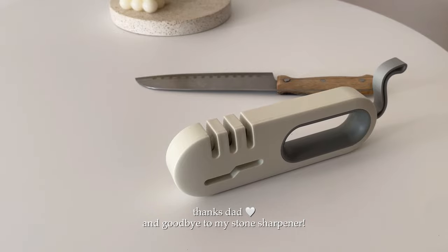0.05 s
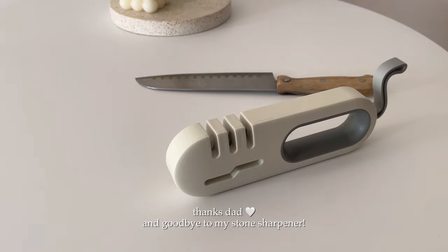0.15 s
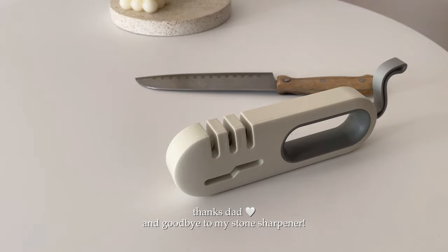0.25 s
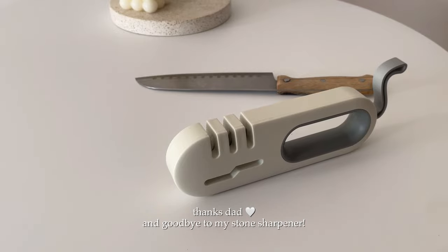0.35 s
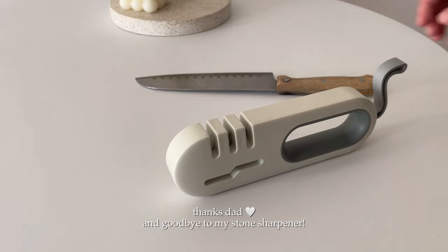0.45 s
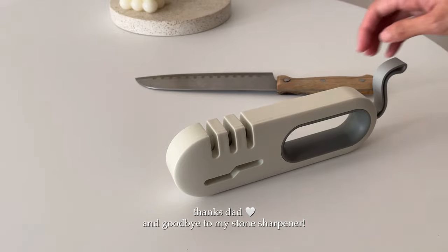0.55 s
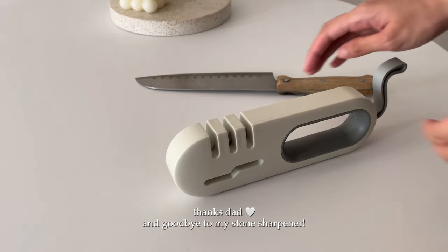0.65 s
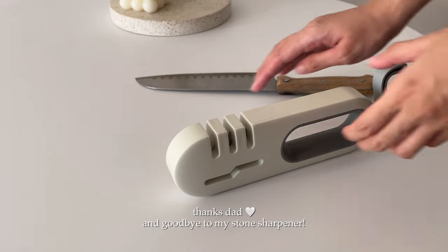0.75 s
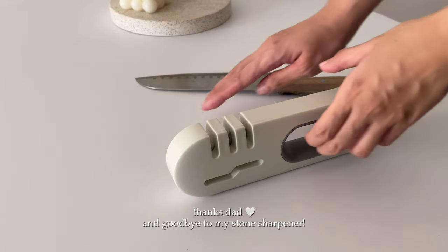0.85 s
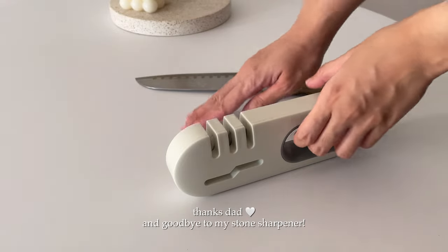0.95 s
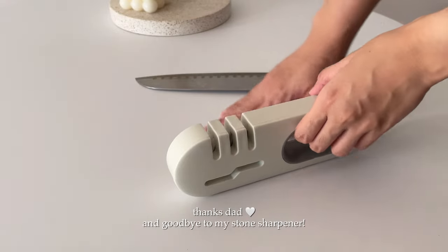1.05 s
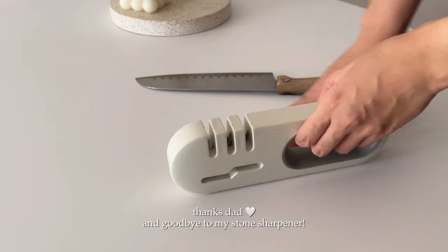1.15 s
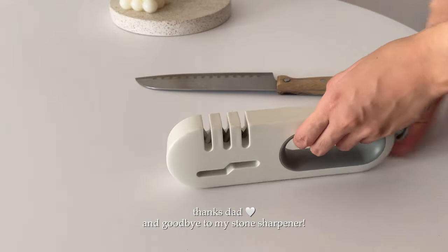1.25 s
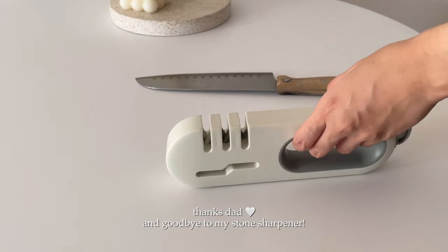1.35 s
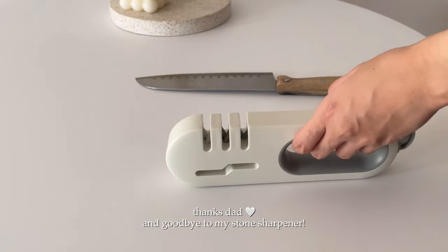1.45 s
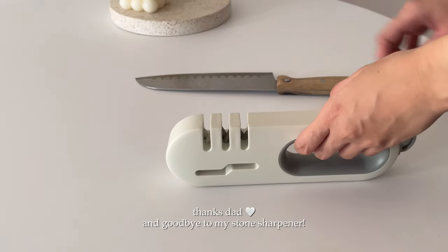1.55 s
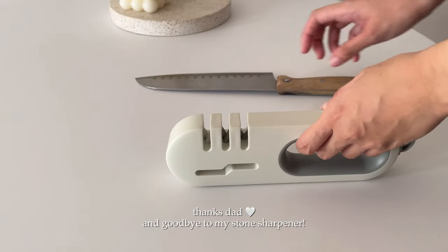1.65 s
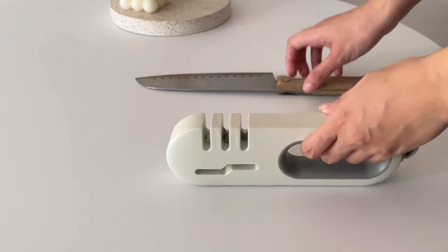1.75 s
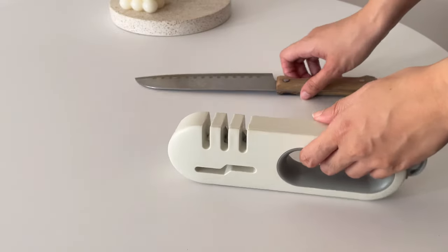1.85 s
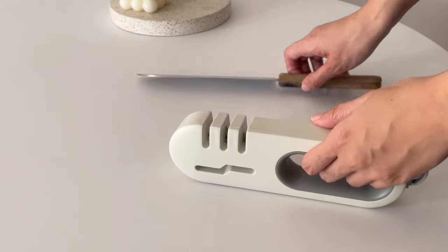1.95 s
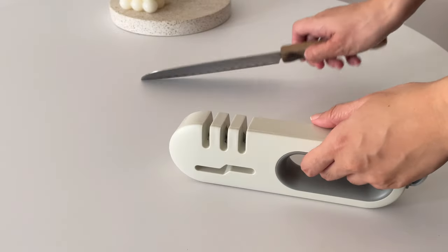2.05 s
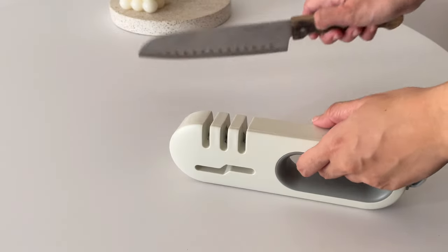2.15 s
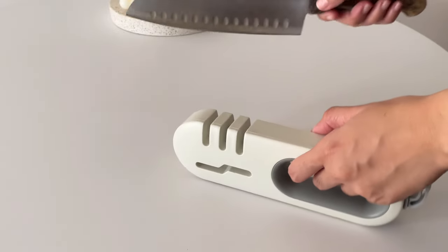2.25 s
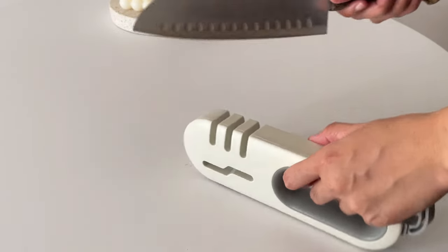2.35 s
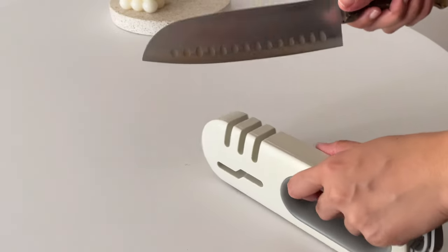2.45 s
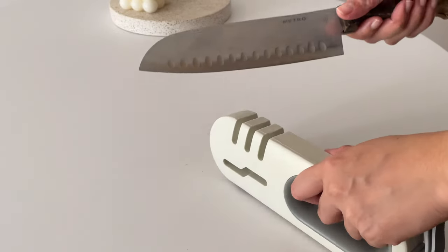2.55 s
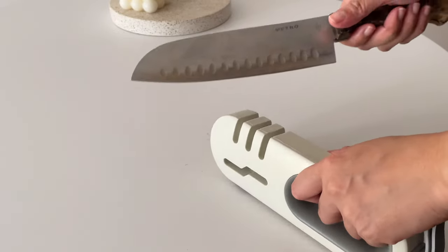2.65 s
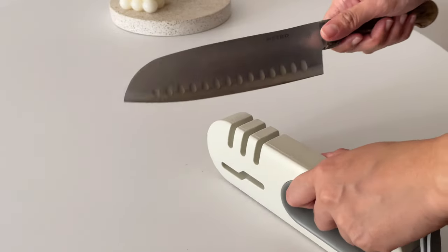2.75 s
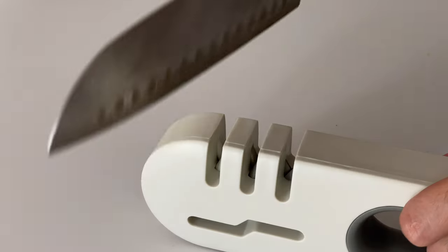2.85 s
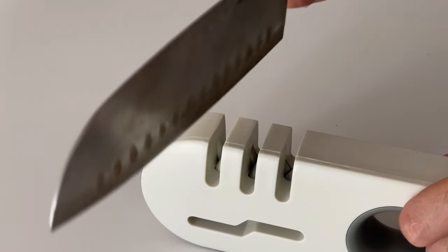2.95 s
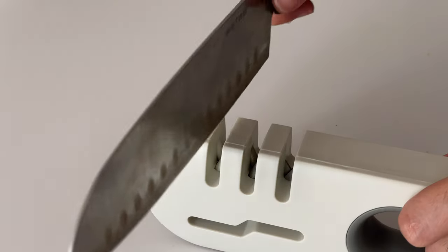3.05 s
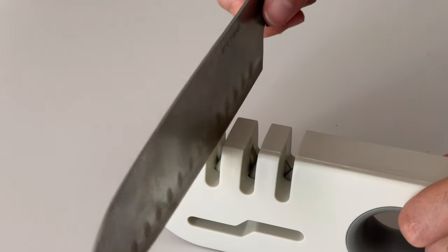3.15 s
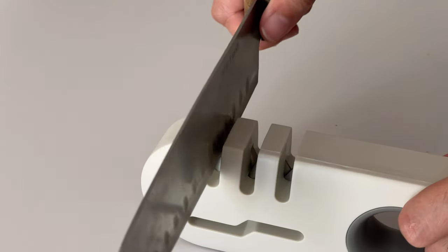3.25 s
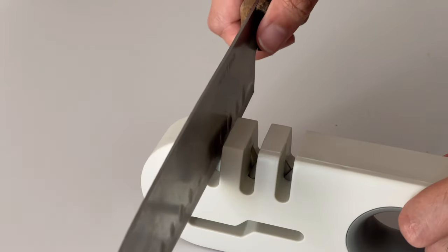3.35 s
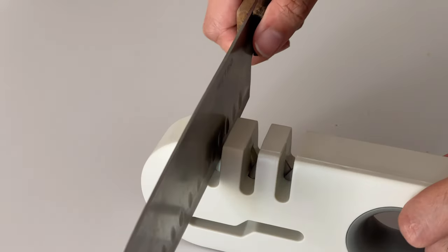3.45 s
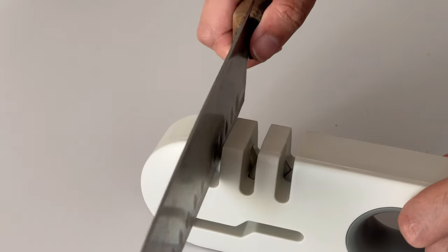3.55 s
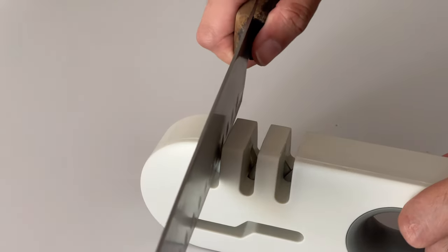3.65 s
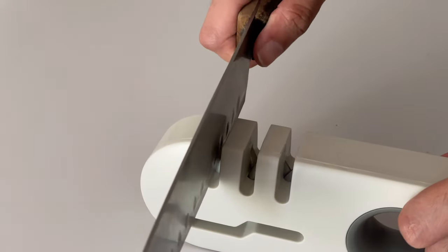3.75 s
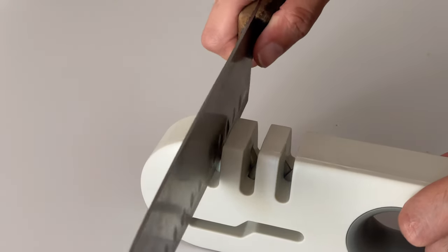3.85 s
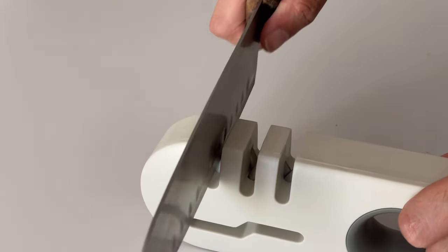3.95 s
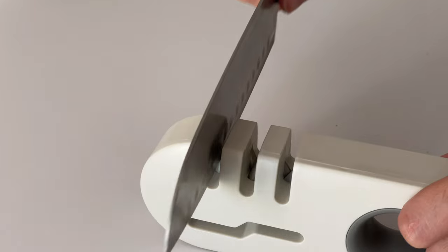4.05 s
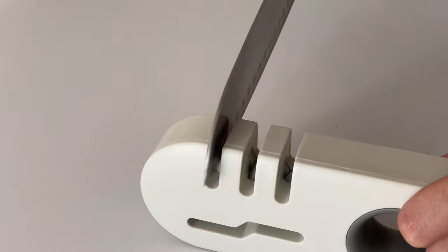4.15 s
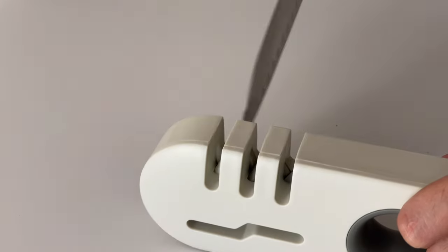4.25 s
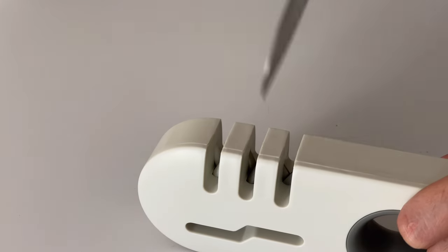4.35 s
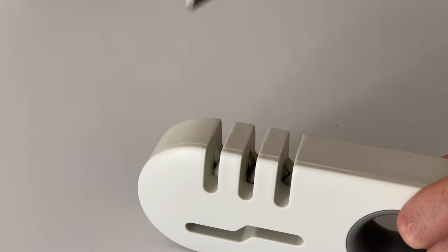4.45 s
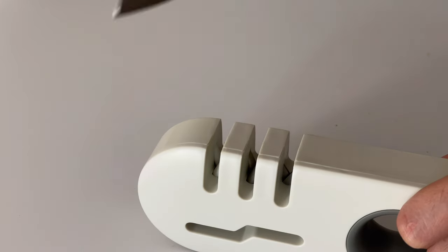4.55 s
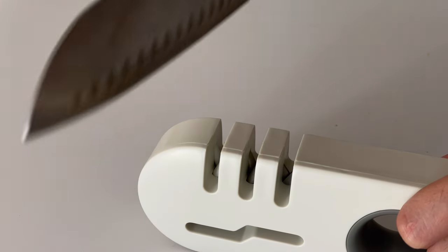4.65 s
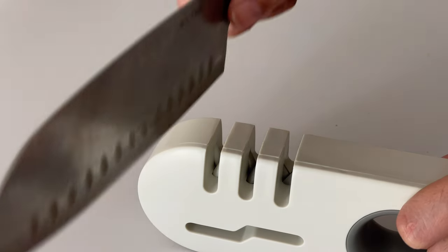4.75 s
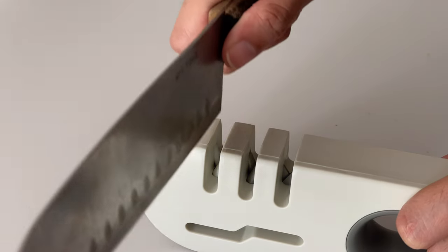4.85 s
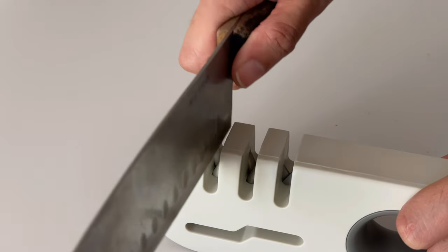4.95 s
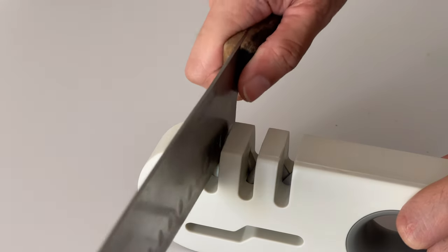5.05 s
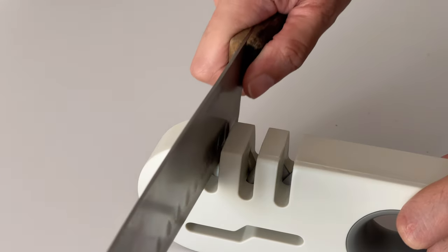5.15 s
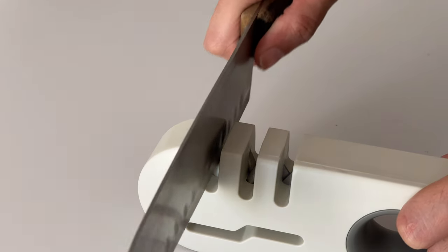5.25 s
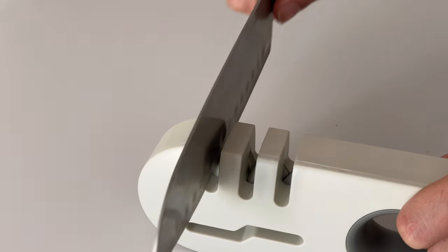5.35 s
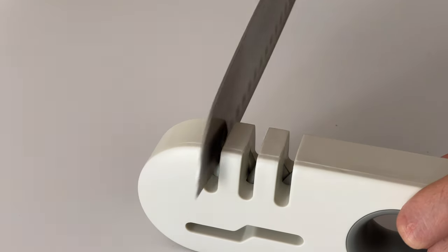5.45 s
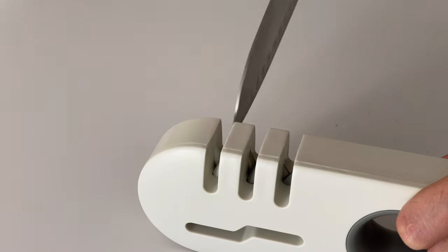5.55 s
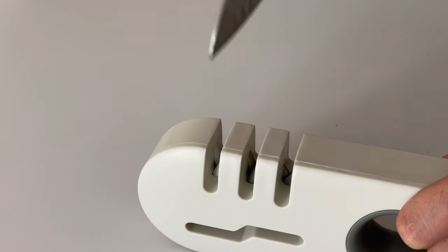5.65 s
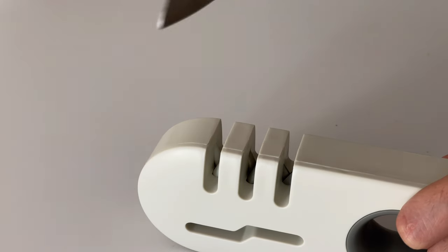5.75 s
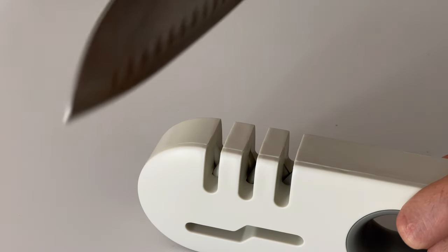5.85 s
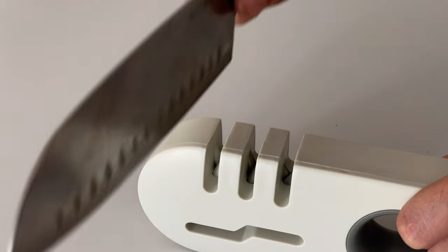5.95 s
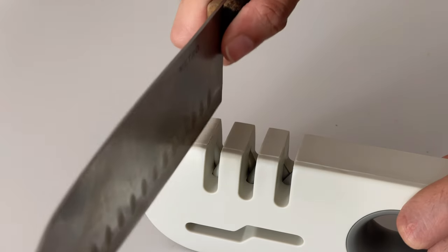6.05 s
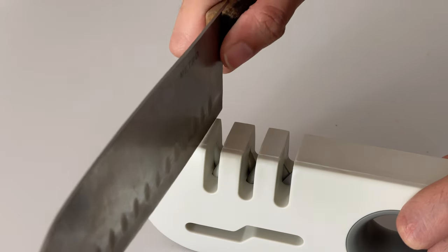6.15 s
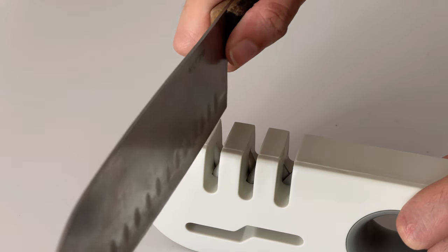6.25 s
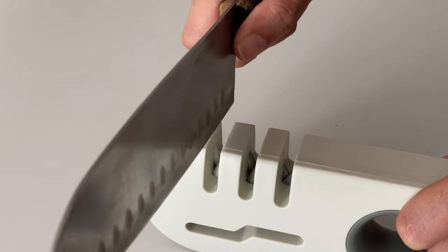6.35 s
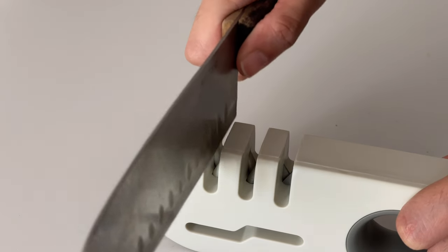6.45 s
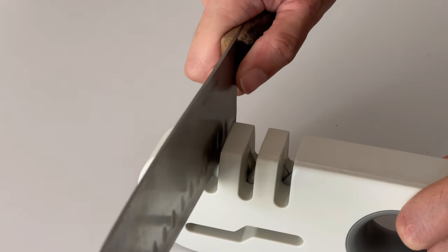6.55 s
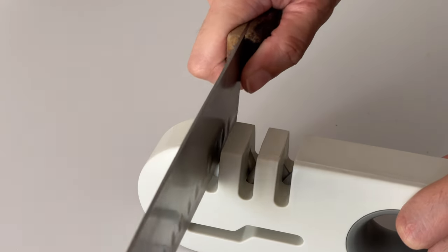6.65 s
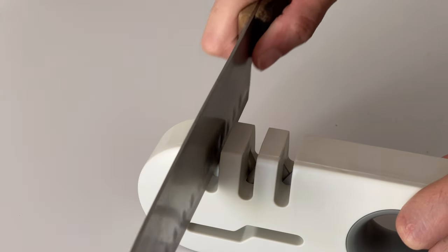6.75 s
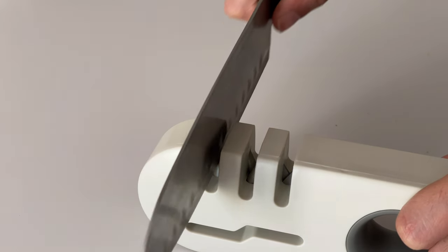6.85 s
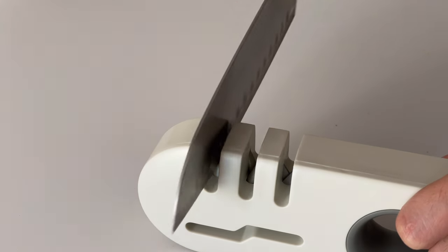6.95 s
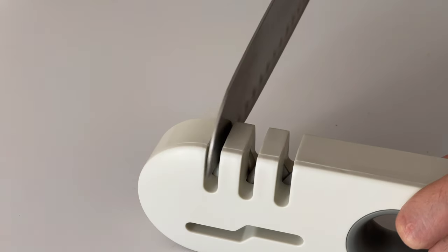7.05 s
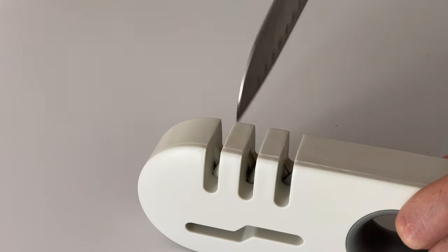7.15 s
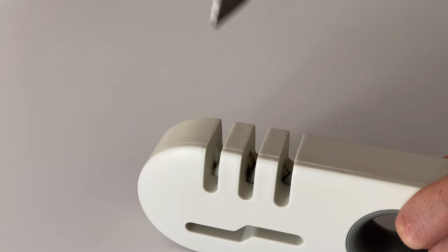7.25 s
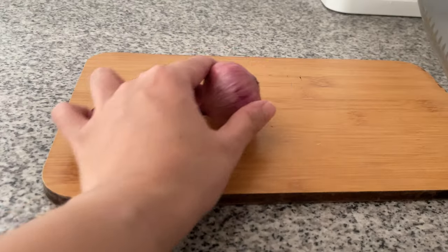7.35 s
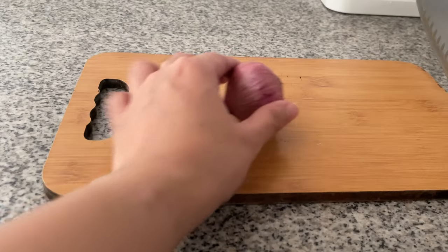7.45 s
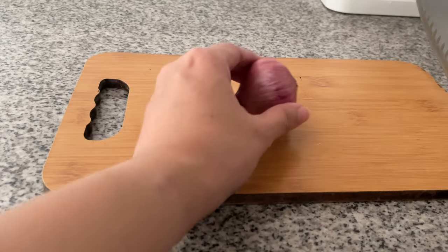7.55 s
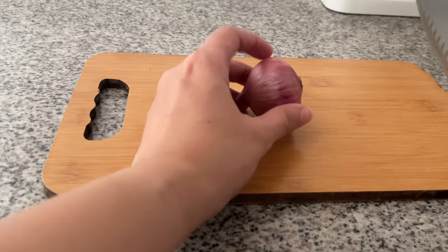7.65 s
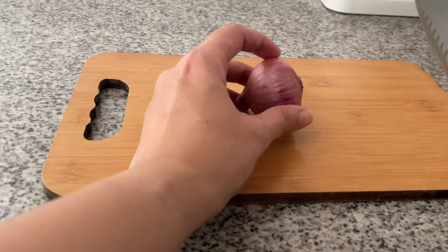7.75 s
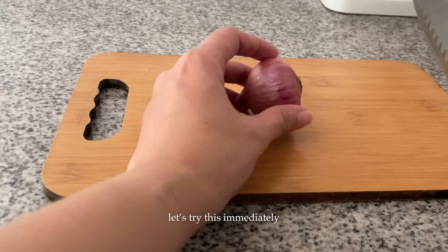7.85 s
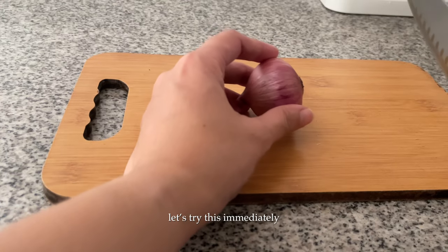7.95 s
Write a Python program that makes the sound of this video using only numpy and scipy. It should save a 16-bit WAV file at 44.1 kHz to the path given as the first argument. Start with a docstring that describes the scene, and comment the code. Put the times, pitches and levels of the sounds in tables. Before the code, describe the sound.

Soft handling and rubbing on a table, then three separate raspy steel-on-abrasive strokes with clinks and hard clicks in a quiet room.

```python
"""Over a small room's hum and air, hands slide a plastic sharpener on a table: friction noise, rubbing feet, bumps.
A knife is picked up, its wooden handle juddering in damped modes; the edge then scuffs and clinks in the slot.
Three pulls follow: abrasive slips excite the steel's resonances and shake the plastic body. Impacts knock
the sharpener on the table, hardest as the tip drops out of the first pull.
The room tone is softest while the blade works. At the end a hand rustles softly."""
import sys
import numpy as np
from scipy import signal
from scipy.fft import rfft, irfft, next_fast_len
from scipy.io import wavfile
from scipy.ndimage import uniform_filter1d, map_coordinates

SR = 44100
rng = np.random.default_rng(int(sys.argv[2]) if len(sys.argv) > 2 else 0)


def put_to_file(sound):
    """Save the sound as 16-bit audio at rate SR, in the file named by the first command-line argument."""
    columns = np.atleast_2d(sound).T  # one column per channel
    safe = np.clip(columns, -1, 1)
    whole_steps = np.round(safe * 32767)
    wavfile.write(sys.argv[1], SR, whole_steps.astype(np.int16))


N = 353108

# Event levels set the balance within a layer; layer gains follow in the functions.
# resonances of the blade in the slot: f/Hz, width/Hz, relative level/dB
BLADE_MODES = [(1515, 76, 1), (1890, 72, -10), (2363, 140, -7), (3056, 64, 0.5), (3995, 200, -1.5),
               (4740, 40, -4), (5063, 150, 2), (5300, 48, -8), (6900, 52, -4), (7540, 41, -16),
               (12000, 110, -8), (12900, 320, -3), (13500, 94, -14), (14400, 290, -11.5)]
# spectrum of the grit on the edge: f/Hz, relative level per Hz/dB
GRIT_SPECTRUM = [(300, -32), (800, -15), (1300, -12.5), (3000, -7), (5200, -6.5), (6500, -8), (8000, -2),
                 (10000, -5.5), (13000, -6), (16000, -14.5)]
# spectrum of the shaken plastic body: f/Hz, relative level per Hz/dB
BODY_SPECTRUM = [(40, -18.5), (130, -14.5), (240, 5), (330, -5.5), (500, -10), (900, -23), (1800, -40.5)]
# spectrum of the rasp as the tip passes: f/Hz, relative level per Hz/dB
TIP_SPECTRUM = [(1200, -22), (2800, -7), (4000, 0), (5400, 1.5), (7000, -4), (9000, -10.5), (16000, -24)]


def grinding(grain_db, judder_db, drift):
    """Friction excitation: grains tear at the edge; tiny slips ring the blade and shake the plastic body."""
    coarse, fine, chatter, rasp = edge_contact()
    roughness_db = grain_db * wobble(1800) + judder_db * wobble(200)
    slips = unit(rng.standard_normal(N) * amp(roughness_db))

    def steel_gain(hz):
        return np.sqrt(resonances(BLADE_MODES, hz) + amp(along(GRIT_SPECTRUM, hz)) ** 2)

    def above(hz, edge_hz):
        return 1 / (1 + (edge_hz / (hz + 1)) ** 12)

    steel = patchy(ringing(slips, steel_gain), depth_db=2.2)
    low = unit(filtered(steel, lambda hz: 1 - above(hz, edge_hz=2740)))
    middle = unit(filtered(steel, lambda hz: above(hz, edge_hz=2640) - above(hz, edge_hz=7050)))
    high = unit(filtered(steel, lambda hz: above(hz, edge_hz=6930)))
    # the middle resonances wander as the clamped point and the pressure change
    shift = np.cumsum(drift * wobble(25))
    middle = map_coordinates(middle, [np.arange(N) + shift], mode="mirror")
    blade = amp(-1.0) * chatter * low + amp(0.2) * coarse * middle + amp(3) * fine * high
    tip = rasp * coloured(slips, TIP_SPECTRUM)
    body = chatter * coloured(slips, BODY_SPECTRUM)
    return blade + tip + body


# pulls of the edge through the slot: start t/s, end t/s, grinding level/dB, time to bite/s,
# tip passes t/s, tip rasp level/dB, blade chatter level/dB
PULLS = [(3.855, 4.231, -46, .06, 4.224, -39.5, -50.5), (5.108, 5.536, -49, 0.031, 5.503, -39, -51),
         (6.624, 7.107, -50, 0.044, 7.099, -46, -51.5)]
# the edge scuffs and catches while it settles: start t/s, end t/s, grinding level/dB, blade chatter level/dB
SCUFFS = [(3.298, 3.352, -63.5, -67.5), (3.397, 3.436, -68, -63), (3.466, 3.553, -73.5, -72.5),
          (3.677, 3.71, -78.5, -74.5), (5.026, 5.071, -57.5, -52), (5.16, 5.175, -53.5, -65.5),
          (6.514, 6.554, -63, -52)]
BITE_DB = 22  # the grinding starts this far below its full level
SPEED_UP_S = 0.088  # time constant with which the hand gathers speed
HISS_DB, HISS_GROWS_DB = -1.5, 26.5  # fine hiss at full speed re grinding, before band gains; growth from rest
CHATTER_GROWS_DB = 16.5  # growth of the blade's chatter from rest
LIFT_S = 0.018  # the edge meets and leaves the abrasive
TIP_S, TIP_HISS_DB, TIP_CHATTER_DB = 0.02, 3, 1  # width of the tip's passing; its lift of hiss and chatter
SCUFF_RISE_S, SCUFF_FALL_S, SCUFF_HISS_DB = 0.013, .04, -11  # hiss re grinding, before band gains


def edge_contact():
    """Speed-dependent friction: gains of grinding, hiss, chatter and rasp as edge bites, hand speeds up, tip passes."""
    coarse, fine, chatter, rasp = np.zeros((4, N))
    for start, end, db, bite_s, tip_s, tip_db, chatter_db in PULLS:
        age = np.maximum(clock() - start, 0)
        touch = swell(start, end, LIFT_S, LIFT_S)
        slowness = np.exp(-age / SPEED_UP_S)
        tip = bell(tip_s, TIP_S)
        coarse += touch * amp(db - BITE_DB * np.exp(-age / bite_s))
        fine += touch * amp(db + HISS_DB - HISS_GROWS_DB * slowness + TIP_HISS_DB * tip)
        chatter += touch * amp(chatter_db - CHATTER_GROWS_DB * slowness + TIP_CHATTER_DB * tip)
        rasp += touch * amp(tip_db) * tip
    for start, end, db, chatter_db in SCUFFS:
        touch = swell(start, end, SCUFF_RISE_S, SCUFF_FALL_S)
        coarse += touch * amp(db)
        fine += touch * amp(db + SCUFF_HISS_DB)
        chatter += touch * amp(chatter_db)
    return coarse, fine, chatter, rasp


def patchy(x, depth_db):
    """Moving excitation point: each band swells and fades on its own as the contact travels along the blade."""
    z = signal.stft(x, nperseg=512)[2]
    field = rng.standard_normal(z.shape)
    field = uniform_filter1d(field, size=4, axis=0)  # smooth over frequency
    field = uniform_filter1d(field, size=12, axis=1)  # smooth over time
    return signal.istft(z * amp(depth_db * unit(field)), nperseg=512)[1][:N]


# the blade clinks against the slot's wall: t/s, blade ring level/dB, bright tick level/dB, thump level/dB
CLINKS = [(3.2866, -49, -46, -73), (3.544, -78, -60.5, -71), (3.8096, -74.5, -66.5, -73.5),
          (4.999, -56, -63, -56.5), (5.021, -45, -48, -61.5), (6.507, -45, -42.5, -46.5)]
# the blade lands in the slot or drops off it and knocks the sharpener on the table:
# t/s, click level/dB, bright tick level/dB, thump level/dB, table boom level/dB
KNOCKS = [(3.8335, -64, -62, -60, -75.5), (4.2304, -17, -37, -25, -37), (5.0691, -37.5, -42.5, -44, -44.5),
          (6.096, -39, -72, -46, -49.5), (6.563, -38.5, -44.5, -48.5, -47),
          (7.1259, -42.5, -46.5, -40.5, -50)]
# dull bumps of things being shifted: t/s, level/dB
BUMPS = [(1.06, -53.5), (1.189, -45), (1.225, -62), (1.371, -49.5), (1.451, -53), (7.41, -69), (7.778, -52)]
# modes of the sharpener's thump on the table: f/Hz, relative level/dB, t60/s
THUMP_MODES = [(227.1, -4, 0.2), (254.6, -0.5, 0.21), (304.7, -14, 0.27), (423, -12, 0.13),
               (624, -21.5, .12), (1140, -19, 0.095)]
# modes of the table top's boom: f/Hz, relative level/dB, t60/s
BOOM_MODES = [(91, -4, 0.2), (122.8, 1.5, 0.16), (159.6, -5, 0.31)]
# spectrum of the click: f/Hz, relative level per Hz/dB
CLICK_SPECTRUM = [(150, -13), (400, 2.5), (600, 6), (800, -1.5), (1150, 3.5), (1550, 1.5), (1900, -10.5),
                  (2500, -2.5), (3500, -13.5), (5000, -23), (7000, -24), (15000, -47.5)]
# spectrum of the bright tick: f/Hz, relative level per Hz/dB
TICK_SPECTRUM = [(1000, -16.5), (3000, -1.5), (5000, -7), (7500, -3.5), (12500, -7), (16000, -15.5)]
# click re ring in a clink; ring re click in a knock; both before layer gains
CLINK_CLICK_DB, KNOCK_RING_DB = -7, -25


def contacts(click_t60, tick_t60, ring_t60):
    """Impact excitation: steel strikes the slot, clicks and rings; sharpener and table answer in damped modes."""
    clicks, ticks, rings, lows = np.zeros((4, N))
    blows = [(s, db + CLINK_CLICK_DB, tick_db, db, thump_db) for s, db, tick_db, thump_db in CLINKS]
    blows += [(s, db, tick_db, db + KNOCK_RING_DB, thump_db) for s, db, tick_db, thump_db, _ in KNOCKS]
    for s, click_db, tick_db, ring_db, thump_db in blows:
        add(clicks, s, amp(click_db) * crack(click_t60, spike_db=8.5))
        add(ticks, s, amp(tick_db) * crack(tick_t60, spike_db=5.0))
        add(rings, s, amp(ring_db) * burst(ring_t60))
        add(lows, s, amp(thump_db + 5) * knock(THUMP_MODES, rise=0.0044))
    for s, *_, boom_db in KNOCKS:
        add(lows, s, amp(boom_db + 5.0) * knock(BOOM_MODES, rise=0.0033))
    for s, db in BUMPS:
        add(lows, s, amp(db + 4.0) * knock(BOOM_MODES, rise=0.0025))
    # a blow rings the low bending modes more than grinding does
    steel = ringing(rings, lambda hz: np.sqrt(resonances(BLADE_MODES, hz) / (1 + (hz / 2600) ** 2)))
    click = amp(-5.5) * coloured(clicks, CLICK_SPECTRUM)
    tick = amp(3.0) * coloured(ticks, TICK_SPECTRUM)
    return click + tick + steel + lows


def crack(t60, spike_db):
    """Two-stage decay: a hard first instant, then a short rattle."""
    return burst(t60) + amp(spike_db) * burst(t60 / 7)


def knock(modes, rise):
    """Modal synthesis: a soft contact pushes damped modes, at new strengths each time."""
    t = np.arange(SR // 2) / SR
    ring = np.zeros(len(t))
    for hz, db, t60 in modes:
        decay_db = db + rng.normal(0, 1) - 60 * t / t60
        ring += amp(decay_db) * np.sin(2 * np.pi * hz * t)
    return ring * (1 - np.exp(-(t / rise) ** 2))


# light taps of fingers and handle: t/s, level/dB
TAPS = [(0.313, -49), (0.335, -47.5), (0.4912, -49.5), (2.7273, -55.5), (2.7518, -50.5), (2.7701, -51),
        (2.8171, -50), (7.3264, -52), (7.915, -59)]
# the wooden handle judders over the table: t/s, width/s, level/dB, lowest resonance f/Hz, upper modes level/dB
JUDDERS = [(1.787, 0.011, -38.5, 316, -7), (1.815, 0.011, -44.5, 312, 3), (1.861, 0.068, -52.5, 226, -8),
           (1.99, 0.055, -49.5, 268, -13.5), (2.065, 0.017, -43, 414, 1)]
# upper resonances of the handle: f/Hz, width/Hz, relative level/dB
HANDLE_MODES = [(436, 29, 1.5), (723, 25, -1.5), (1138, 18, -5.5), (1730, 54, -19.5), (2030, 51, -25),
                (2450, 71, -21), (3590, 230, -28.5)]


def handling():
    """Source and resonator: short noise makes the finger taps; noisy pushes ring the wooden handle's modes."""
    taps, wood = np.zeros((2, N))
    for s, db in TAPS:
        add(taps, s, amp(db) * burst(t60=0.056))
    for s, width, db, lowest_hz, upper_db in JUDDERS:
        push = amp(db) * np.exp(-.5 * ((clock() - s) / width) ** 2) * rng.standard_normal(N)

        def gain(hz):
            lowest = resonances([(lowest_hz, 25, -upper_db)], hz) * amp(-12 * np.log2(1 + hz / 2500))
            return np.sqrt(lowest + resonances(HANDLE_MODES, hz))

        wood += ringing(push, gain)
    tap_spectrum = [(1200, 2), (2600, 2.0), (6000, -9.5), (12500, -8.5), (16000, -23)]
    return amp(-9.5) * coloured(taps, tap_spectrum) + wood


# skin and plastic slide on the table: full speed from t/s, until t/s, rise/s, fall/s, swish level/dB, drag level/dB
SWEEPS = [(0.333, 0.33, 0.026, 0.11, -69, -62), (.5, 0.744, 0.023, 0.072, -61.5, -65),
          (1.298, 1.3, 0.26, 0.051, -47.5, -43), (1.5, 1.51, 0.067, .1, -71.5, -70),
          (1.787, 1.796, 0.096, 0.13, -70, -61), (2.053, 2.068, 0.18, 0.035, -71, -65.5),
          (2.31, 2.45, 0.28, 0.22, -69, -64), (7.382, 7.47, 0.13, 0.19, -69, -76.5),
          (7.98, 8.01, 0.32, .1, -77, -81)]
# spectrum of skin on the table: f/Hz, relative level per Hz/dB
SWISH_SPECTRUM = [(2000, -15), (5000, -11), (8000, 0.5), (10000, 0), (12500, 4), (16000, -10)]
# spectrum of dragged plastic: f/Hz, relative level per Hz/dB
DRAG_SPECTRUM = [(900, -32), (1900, -8), (2700, -3), (3600, -4.5), (4700, -3.5), (6500, -2), (9000, -15),
                 (14000, -40)]


def sliding(flutter_db):
    """Sliding friction noise: skin swishes over the table top; the dragged sharpener adds a lower rasp."""
    swish, drag = np.zeros((2, N))
    for start, end, rise, fall, swish_db, drag_db in SWEEPS:
        speed = swell(start, end, rise, fall)
        swish += amp(swish_db) * speed
        drag += amp(drag_db) * speed
    skin = amp(2.0) * swish * coloured(rng.standard_normal(N), SWISH_SPECTRUM)
    plastic = amp(-3.5) * drag * coloured(rng.standard_normal(N), DRAG_SPECTRUM)
    return amp(flutter_db * wobble(73)) * (skin + plastic)


# the sharpener's feet rub as it is turned: loudest at t/s, rise/s, fall/s, pitch f/Hz, glide/(octaves per s),
# width/Hz, level/dB
FOOT_RUBS = [(1.159, 0.13, 0.087, 1855, 0.31, 263, -55.5), (1.315, 0.087, 0.068, 4450, 0.31, 1084, -46),
             (1.52, 0.38, 0.33, 1037, -.4, 85, -62.5)]


def rubbing():
    """Stick-slip oscillation: rubber feet catch and release on the table in a fuzzy, gliding tone."""
    out = np.zeros(N)
    for s, rise, fall, hz, glide, width_hz, db in FOOT_RUBS:
        glided_hz = hz * 2 ** (glide * np.clip(clock() - s, -1, 1))
        # random swerves of the slip rate widen the tone into a band
        slip_hz = glided_hz + width_hz * wobble(1500) / 2
        tone = np.sin(2 * np.pi * np.cumsum(slip_hz) / SR)
        out += amp(db) * swell(s, s, rise, fall) * unit(wobble(150) * tone)
    return out


# reverberation time of the room: f/Hz, t60/s
WALLS_T60 = [(150, 0.64), (500, 0.66), (1500, 0.36), (4000, 0.42), (12000, 0.31)]
# left-right likeness of the echo, as one minus the side's power re the mid: f/Hz, likeness
ECHO_ALIKE = [(60, 0.92), (130, .92), (300, 0.82), (600, 0.17), (4000, 0.16), (12000, .5)]


def walls(x, size=SR // 3):
    """Diffuse reverberation: noise tails, new for each stretch of sound, with a decay rate for each frequency."""
    mid, side = np.zeros((2, N))
    for start in range(0, N, size):
        hz, t, z = signal.stft(rng.standard_normal((2, SR // 2)), SR, nperseg=256)
        decay = amp(-60 * t / along(WALLS_T60, hz)[:, None])
        tail = signal.istft(z * decay, SR, nperseg=256)[1]
        stretch = x[start:start + 2 * size]
        stretch = stretch * signal.get_window("hann", 2 * size)[:len(stretch)]
        echo = signal.fftconvolve(stretch[None], tail / np.linalg.norm(tail[0]), axes=1)
        add(mid, start / SR + .007, echo[0])  # the echo starts 7 ms late
        add(side, start / SR + .007, echo[1])
    side = filtered(side, lambda hz: np.sqrt(np.clip(1 - along(ECHO_ALIKE, hz), 0, 1)))
    return np.array([mid + side, mid - side])


# room tone, softest while the blade works: from t/s, hum level/dB, low air noise level/dB, high air noise level/dB
ROOM_TONE = [(0, -54, -54.5, -54), (2.829, -61.5, -70.5, -70), (7.329, -59.5, -54.5, -61)]
# spectrum of the air noise: f/Hz, relative level per Hz/dB
AIR_SPECTRUM = [(15, -51), (25, -25.5), (36, -13), (53, -1), (136, -11.5), (253, -9), (289, -14),
                (1110, -23), (4500, -42.5), (5580, -48.5), (9810, -63), (12200, -51), (15500, -74)]
# spectrum of the steady noise floor: f/Hz, relative level per Hz/dB
STILL_SPECTRUM = [(25, -24.5), (45, -11), (62, -3), (85, -19.5), (118, -5), (162, -22), (190, -15),
                  (240, -15.5), (445, -24), (1000, -30.5), (4000, -48.5), (9000, -61.5), (12000, -52.5),
                  (15500, -71)]
DIP_S, DIP_WIDTH_S, DIP_DB = 6.4, 0.12, -10  # hum and air dip briefly
AIR_SPLIT_HZ = 1300  # between low and high air noise
DRONE_HZ, DRONE_DB = 160.6, -10  # a second faint tone, re the hum


def background(hum_hz, waver_db):
    """Tones over broadband noise: an appliance hums unsteadily with a second harmonic over the air of the room."""
    s, *levels = np.transpose(ROOM_TONE)
    hum_db, low_db, high_db = np.array(levels)[:, np.searchsorted(s[1:], clock())]
    phase = 2 * np.pi * hum_hz * clock() + 0.5 * wobble(8)
    drone = amp(DRONE_DB) * np.sin(2 * np.pi * DRONE_HZ * clock() + .9 * wobble(12))
    tones = np.sin(phase) + amp(-13.5) * np.sin(2 * phase) + drone
    hum = np.sqrt(2) * tones * amp(hum_db + waver_db * wobble(6.6))
    noise = rush(AIR_SPECTRUM)
    low = filtered(noise, lambda hz: 1 / (1 + (hz / AIR_SPLIT_HZ) ** 6))
    air = amp(1.2 * wobble(14)) * (amp(low_db) * low + amp(high_db) * (noise - low))
    dip = amp(DIP_DB * bell(DIP_S, DIP_WIDTH_S))
    return dip * (hum + air) + amp(-67.0) * rush(STILL_SPECTRUM)


# left-right correlation of the room tone: f/Hz, correlation
AIR_ALIKE = [(60, 0.94), (130, 0.78), (290, 0.45), (640, -0.15), (1410, -0.25), (3100, 0.15), (6820, -0.41),
             (15000, 0.32)]


def rush(spectrum):
    """Diffuse field: stereo noise of given interchannel correlation, its mid part of rms 1."""
    mid = coloured(rng.standard_normal(N), spectrum)
    side = coloured(rng.standard_normal(N), spectrum)

    def turn(hz):
        return np.arccos(np.clip(along(AIR_ALIKE, hz), -1, 1)) / 2

    mid = filtered(mid, lambda hz: np.cos(turn(hz)))
    side = filtered(side, lambda hz: np.sin(turn(hz)))
    return np.array([mid + side, mid - side]) / np.std(mid)


def amp(db):
    """Logarithmic level: decibels to gain."""
    return 10 ** (np.asarray(db) / 20)


def unit(x):
    """Normalization: scale to rms 1."""
    return x / np.sqrt(np.mean(x ** 2) + 1e-20)


def along(points, hz):
    """Log-frequency interpolation of (f/Hz, value) points."""
    f, v = np.transpose(points)
    return np.interp(np.log(hz + 1), np.log(f + 1), v)


def clock():
    """Uniform sampling: the time of every sample in seconds."""
    return np.arange(N) / SR


def wobble(rate):
    """Band-limited fluctuation: a smooth random curve, rate knots a second."""
    return map_coordinates(rng.standard_normal(int(N * rate / SR) + 4), [clock() * rate])


def filtered(x, response):
    """Linear filtering: x times a response of frequency."""
    m = next_fast_len(N + 8192)
    return irfft(rfft(x, m) * response(np.fft.rfftfreq(m, 1 / SR)), m)[..., :N]


def ringing(x, gain, size=4096):
    """Minimum phase: a causal filter of unit energy whose gain over frequency has the given shape."""
    cepstrum = irfft(np.log(np.maximum(gain(np.fft.rfftfreq(size, 1 / SR)), 1e-6)))
    # fold the cepstrum onto positive times
    cepstrum[1:size // 2] *= 2
    cepstrum[size // 2 + 1:] = 0
    response = irfft(np.exp(rfft(cepstrum)))
    return signal.fftconvolve(x, response / np.linalg.norm(response))[:N]


def coloured(x, spectrum):
    """Spectral shaping: x through an (f/Hz, level/dB) spectrum."""
    return ringing(x, lambda hz: amp(along(spectrum, hz)))


def resonances(modes, hz):
    """Damped resonators: summed power response of (f/Hz, width/Hz, level/dB) modes."""
    power = 0
    for centre, width, db in modes:
        damping = (hz * width) ** 2
        power = power + amp(db) ** 2 * damping / ((centre * centre - hz * hz) ** 2 + damping)
    return power


def add(track, s, sound):
    """Superposition: mix a sound into a track at time s."""
    part = track[round(s * SR):][:len(sound)]
    part += sound[:len(part)]


def burst(t60):
    """Exponential decay: noise that starts at once and dies away."""
    t = np.arange(SR // 2) / SR
    return rng.standard_normal(len(t)) * amp(-60 * t / t60)


def swell(start, end, rise, fall):
    """Movement envelope: full from start to end, 20 dB down one rise before and one fall after."""
    t = clock()
    outside = np.maximum(start - t, 0) / rise + np.maximum(t - end, 0) / fall
    return amp(-20 * np.minimum(outside, 10) ** 2)


def bell(s, width):
    """Gaussian envelope: a smooth bump of height 1 around time s."""
    return np.exp(-np.minimum(np.abs(clock() - s) / width, 10) ** 2)


# phase of the direct sound between the two microphone ports: f/Hz, left lead/rad
PORT_PHASE = [(2700, 0), (3800, .5), (5100, .65), (5850, -1.45), (6750, -.85), (7600, -2.3), (8500, -3.05),
              (9100, -3.25), (10000, -4), (11500, -5), (13400, -6.28)]


def scene():
    """Direct and reverberant fields: the sharpener is mostly direct, the hands come more by way of the room."""
    close = grinding(grain_db=1.0, judder_db=1.7, drift=.015) + handling()
    close = close + contacts(click_t60=0.034, tick_t60=0.036, ring_t60=.13)
    hands = sliding(flutter_db=1.0) + rubbing()
    direct = filtered(close + amp(-4.0) * hands,
                      lambda hz: np.exp(.5j * np.outer([1, -1], along(PORT_PHASE, hz))))
    room = walls(amp(-12) * close + amp(-7.5) * hands)
    return direct + room + background(hum_hz=58.3, waver_db=0.6)


# the left port is the stronger, most of all in the bass and low middle: f/Hz, left re right level/dB
PORT_LEAN = [(60, 2), (150, 1.2), (280, 1), (500, 2.4), (1100, .3), (6000, .1)]
TOP_HZ = 15800  # band limit


def record(dry):
    """Band limitation: the two ports differ a little, lose the deepest bass and cut off above the band limit."""
    def response(hz):
        lean = amp(np.outer([.5, -.5], along(PORT_LEAN, hz)))
        low_cut = 1 / np.sqrt(1 + (32 / (hz + 1)) ** 6)
        high_cut = 1 / (1 + (hz / TOP_HZ) ** 200)
        return lean * low_cut * high_cut

    return filtered(dry, response)


dry = scene()
out = record(dry)
put_to_file(out)
```